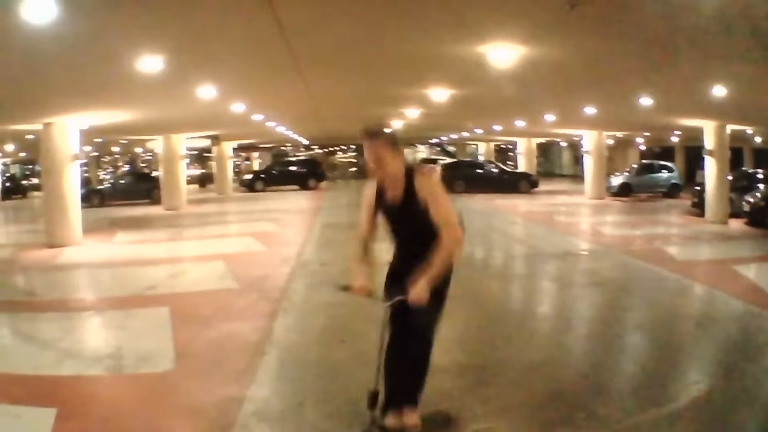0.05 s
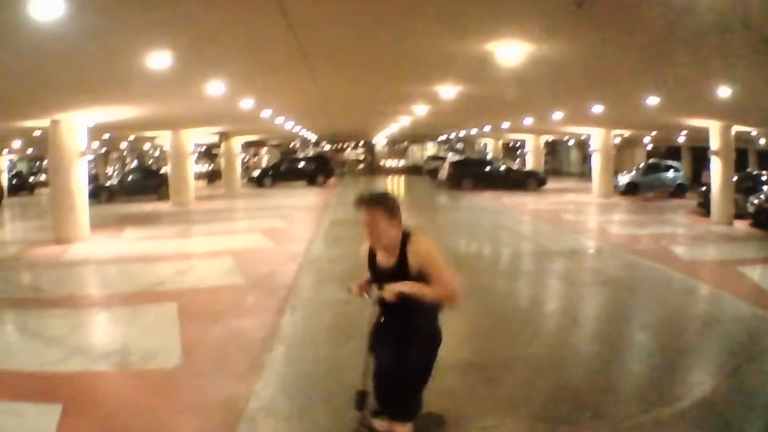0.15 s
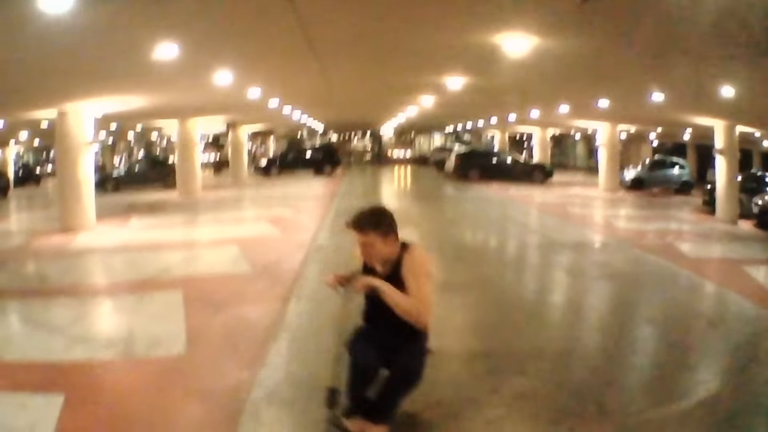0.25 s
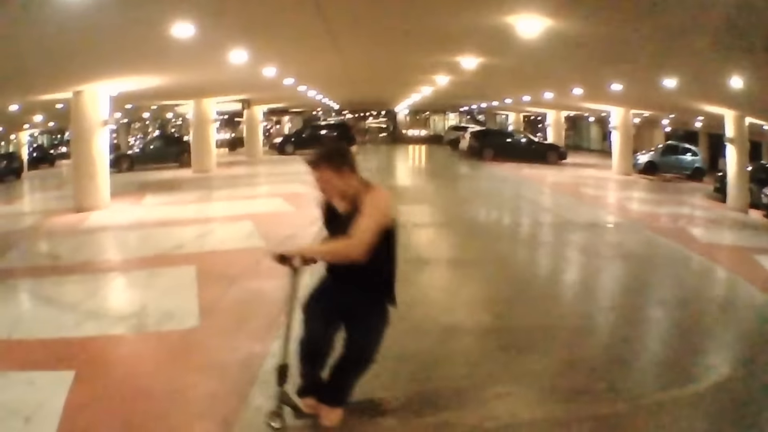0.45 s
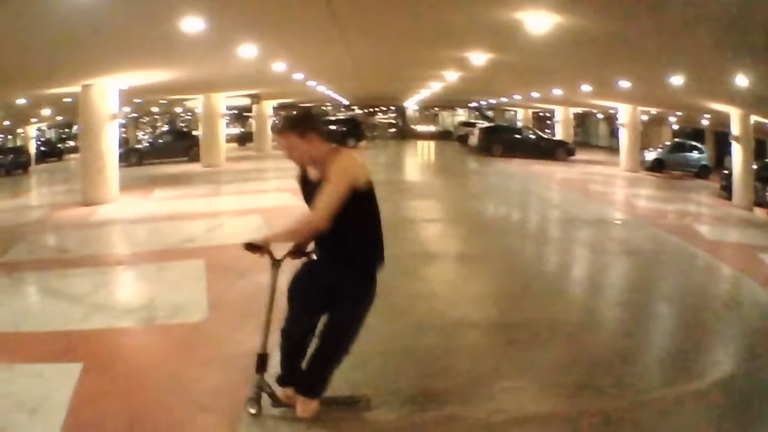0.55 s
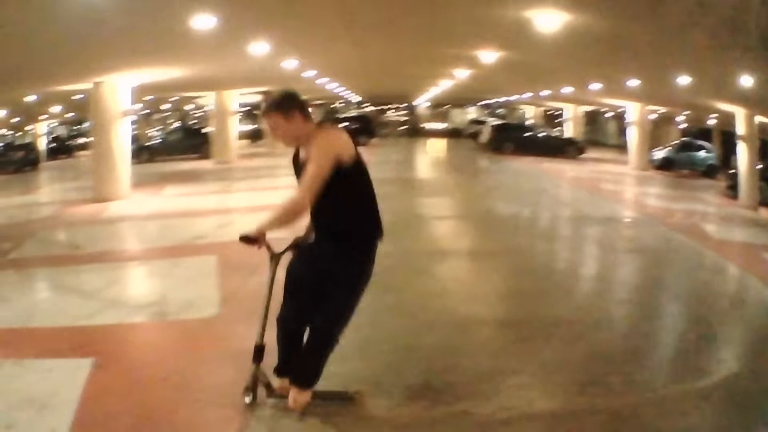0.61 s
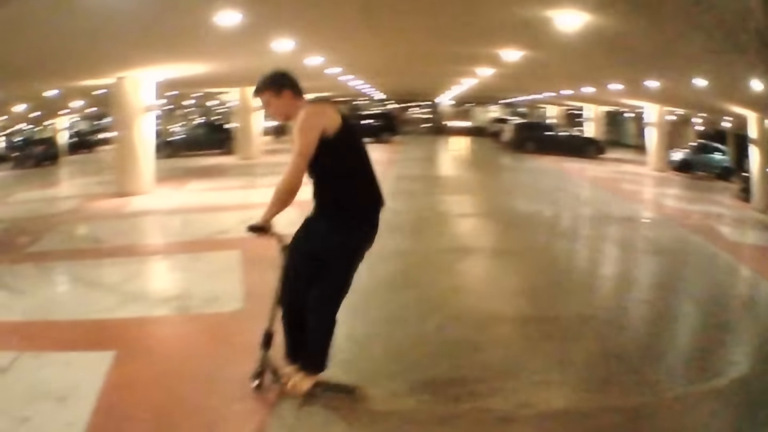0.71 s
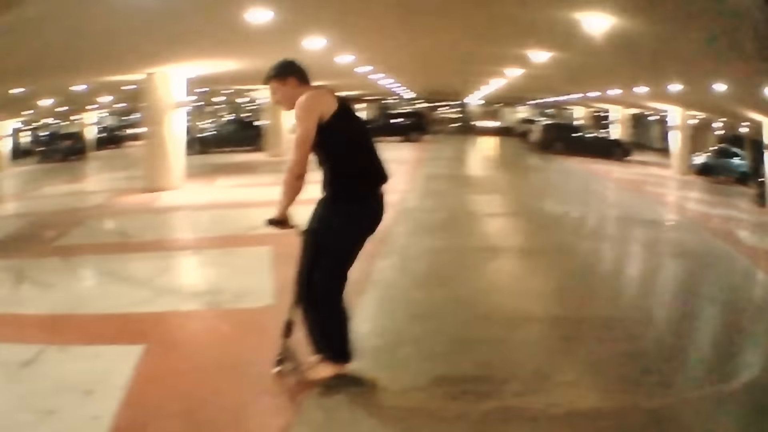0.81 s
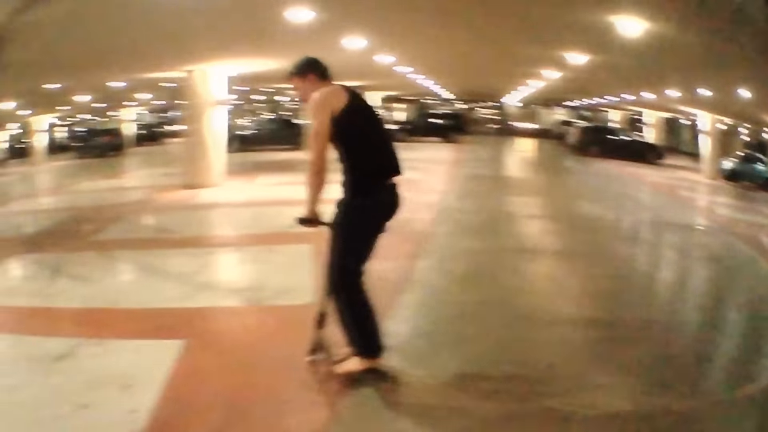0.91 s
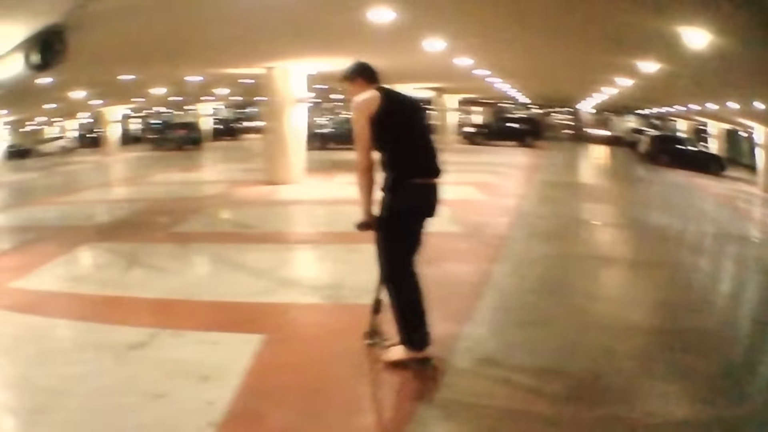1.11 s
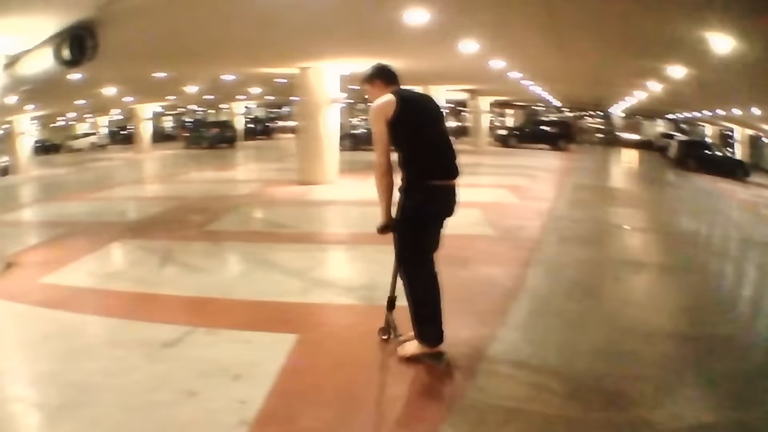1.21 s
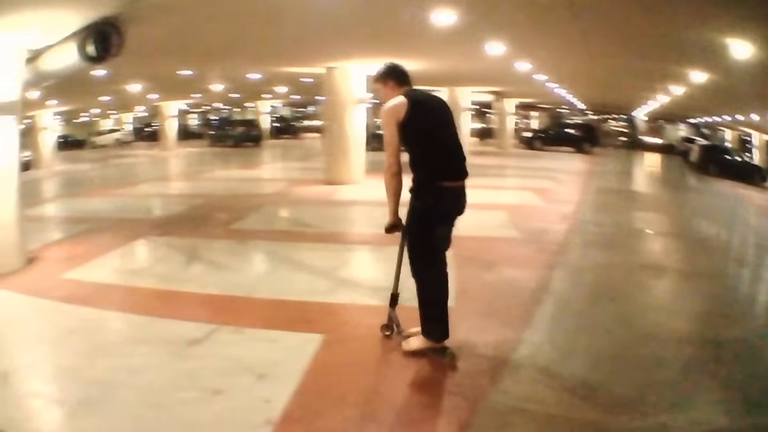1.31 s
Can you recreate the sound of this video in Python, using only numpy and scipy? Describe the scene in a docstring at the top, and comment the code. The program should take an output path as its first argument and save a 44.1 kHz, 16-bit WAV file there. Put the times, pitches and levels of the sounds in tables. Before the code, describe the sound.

A kick scooter slams onto concrete and rolls away in an echoing parking garage.

```python
"""Scooter slam in a parking garage

A kick scooter slams onto concrete with a crack and a ring of its frame, overloading the microphone.
Deck and fork clack as the rider settles, and the large hall rings on. The wheels roll away,
shaken by the grain of the floor, under faint scuffs and over the drone of the ventilation."""
import sys
import numpy as np
from scipy import signal
from scipy.fft import rfft, irfft, next_fast_len
from scipy.io import wavfile
from scipy.ndimage import map_coordinates

SR = 44100
rng = np.random.default_rng(int(sys.argv[2]) if len(sys.argv) > 2 else 0)


def wrap_up_sound(samples):
    """Save the sound to the file named by the first command line argument, as 16-bit audio."""
    columns = np.atleast_2d(samples).T
    # keep every value between -1 and 1, then stretch to whole-number steps
    tamed = np.clip(columns, -1, 1)
    steps = np.round(tamed * 32767).astype(np.int16)
    wavfile.write(sys.argv[1], SR, steps)


N = 59535


def amp(db):
    """Decibels to gain."""
    return 10 ** (np.asarray(db) / 20)


def unit(x):
    """Scale to rms 1."""
    return x / np.sqrt(np.mean(x ** 2) + 1e-20)


def along(points, hz):
    """Read a curve of (Hz, value) points on a log frequency axis."""
    freqs, values = np.transpose(points)
    return np.interp(np.log(hz + 1), np.log(freqs + 1), values)


def filtered(x, response):
    """Shape x with a complex frequency response."""
    size = next_fast_len(len(x) + SR // 5)
    return irfft(rfft(x, size) * response(np.fft.rfftfreq(size, 1 / SR)), size)[:len(x)]


def noise(colour, size=N):
    """Coloured noise of rms 1."""
    return unit(filtered(rng.standard_normal(size), lambda hz: amp(along(colour, hz))))


def wobble(rate):
    """A smooth random curve with rate knots a second."""
    return map_coordinates(rng.standard_normal(N // 20), [np.arange(N) * rate / SR], mode="mirror")


def since(start):
    """Seconds since start, zero before."""
    return np.maximum(np.arange(N) / SR - start, 0)


def passband(x, hz, kind, order=4):
    """A causal low-pass or high-pass."""
    return signal.sosfilt(signal.butter(order, np.clip(hz, 10, SR * .45), kind, fs=SR, output="sos"), x)


def landing(hall_layers=4):
    """The wheels slam down; the hit bounces off the low ceiling and pillars and fills the hall."""
    # Each row: start in seconds, gain in dB, high cut in Hz, low cut in Hz.
    touchdowns = [(0.2084, 4.5, 3320, 2900), (0.2109, -0.5, 12300, 1830), (0.2146, -1, 4490, 60)]
    # Early reflections. Each row: delay in seconds, gain in dB.
    bounces = [(.0065, -22.5), (0.0132, -10.5), (0.0167, -27)]
    dry = sum(contact(*row, ring_scale=0.84) for row in touchdowns)
    early = filtered(dry, lambda hz: sum(amp(db) * np.exp(-2j * np.pi * hz * s) for s, db in bounces))
    # Every layer of the hall gets a fresh crack and a fresh tail.
    hall = sum(garage(contact(*row, ring_scale=0.74)) for row in touchdowns for _ in range(hall_layers))
    return dry + early + hall / np.sqrt(hall_layers)


def contact(start, db, high_cut, low_cut, ring_scale, crack_db=1, crack_t60=0.019, attack_s=0.00014):
    """One knock: a dry crack and the ring of the frame, duller when the contact is soft."""
    # Frame modes. Each row: pitch in Hz, level in dB, T60 in seconds before ring_scale.
    modes = [(458, -18.5, 0.13), (562, -21, 0.067), (782, -12.5, 0.034), (940, -18, 0.093),
             (1322, -12.5, 0.048), (1488.4, -1.5, 0.045), (1873, -13, 0.037), (2398, 1, 0.015),
             (2683, -5, 0.031), (2899, -15, 0.029), (3298, -5.5, 0.027), (3648, -9, .025),
             (4292, -2, 0.027), (4920, -16.5, 0.019), (6280, -10, 0.031)]
    # Each row: frequency in Hz, relative level of the crack in dB.
    crack_colour = [(40, -33.5), (130, -13.5), (450, -9), (900, -4), (1100, -5), (2500, -3), (4500, -3),
                    (5500, -2.5), (7500, -10), (10000, -17), (15000, -30.5)]
    t = np.arange(SR // 6) / SR
    ring = 0
    for k, (hz, level, t60) in enumerate(modes):
        decay = amp(level + rng.standard_normal() - 60 * t / (t60 * ring_scale))
        ring += (-1) ** k * decay * np.sin(2 * np.pi * hz * t)
    crack = amp(crack_db - 60 * t / crack_t60) * noise(crack_colour, size=len(t))
    hit = (ring + crack) * (1 - np.exp(-t / attack_s))
    hit = passband(passband(hit, high_cut, "low"), low_cut, "high")
    return amp(db) * np.pad(hit, (round(start * SR), N))[:N]


def clacks(send_db=-16.5):
    """Deck and fork knock as the rider's weight settles, with less crack under load."""
    # Each row: start in seconds, gain in dB, high cut in Hz, low cut in Hz.
    knocks = [(.2872, -2.5, 1720, 980), (0.2936, -1, 1570, 930), (.303, -10.5, 1440, 600),
              (0.3181, -6, 1390, 727), (0.3273, -7.5, 1410, 800), (0.353, -6, 1500, 600),
              (0.365, -10.5, 4200, 1975), (.3705, -11.5, 5500, 2040), (0.3739, -8, 6000, 2130),
              (0.39, -10.5, 3000, 1490), (0.447, -10.5, 2470, 2000), (0.455, -3, 2170, 1500),
              (0.462, -1.5, 2230, 1600), (0.4684, -6.5, 2050, 1300), (0.4743, -10, 2290, 1410),
              (.481, -10.5, 3020, 1460), (0.536, -4, 1650, 1120), (0.625, -13.5, 1590, 923),
              (.706, -13, 1616, 960), (0.7906, -28, 1590, 910), (0.8174, -9.5, 1600, 1000)]
    dry = sum(contact(*row, ring_scale=0.97, crack_db=-4.5) for row in knocks)
    return dry + amp(send_db) * garage(dry)


def garage(x, gain_db=0.5, build_s=0.027):
    """Long concrete reverb: it builds quickly, and the mids hang on longest."""
    # Each row: frequency in Hz, reverb T60 in seconds.
    decay_times = [(120, 1), (500, 3.5), (1400, 5), (2500, 3.5), (4200, 1.8444), (6400, 1.17),
                   (9000, 0.7853), (14000, 0.47)]
    # Each row: frequency in Hz, gain of the tail in dB.
    colour = [(60, -4.5), (130, 6.5), (400, 7), (600, 3.5), (900, 3.5), (1020, 0), (1150, 8.5), (1480, 0.5),
              (1900, 0.5), (2500, -6.5), (3350, -5), (4280, -7), (4700, 2.5), (5300, -8.5), (6450, 1.5),
              (8000, -6), (10000, -2.5), (14000, -7.5)]
    hz, t, bands = signal.stft(rng.standard_normal(N), SR, nperseg=256)
    decay = amp(-60 * t / along(decay_times, hz)[:, None])
    tail = signal.istft(bands * decay, SR, nperseg=256)[1][:N]
    tail = filtered(tail, lambda f: amp(along(colour, f)))
    tail *= 1 - np.exp(-since(0) / build_s)
    return amp(gain_db) * signal.fftconvolve(x, tail)[:N] / np.sqrt(SR / 10)


def wheels(roughness_db=3.5):
    """The grain of the floor shakes the scooter's resonances through hard wheels as it rolls away."""
    # Each row: time in seconds, level of the roll in dB.
    fader = [(.2, -85), (.23, -24.5), (.4, -29), (0.551, -24), (0.799, -30.5), (1.052, -36.5),
             (1.35, -38.5)]
    # Each row: centre in Hz, width in Hz, gain in dB.
    resonances = [(129.9, 6.9, 6), (195, 24, -6.5), (377, 102.5, -5.5), (572, 210, -11.5),
                  (787, 380, -11.5), (1396, 70, -8.5), (1475, 82, 3), (2470, 250, -15.5), (3250, 120, -9.5)]
    grain = rng.standard_normal(N) * amp(-roughness_db * wobble(rate=70))
    rolling = filtered(grain, lambda f: sum(
        (-1) ** k * amp(db) * 1j * f * width / (centre ** 2 - f ** 2 + 1j * f * width)
        for k, (centre, width, db) in enumerate(resonances)))
    rolling = passband(rolling, hz=3720, kind="low")
    rolling = passband(rolling, hz=79, kind="high", order=3)
    return unit(rolling) * amp(np.interp(since(0), *np.transpose(fader)))


def scuffs():
    """Faint hissy ticks and scuffs around the rider."""
    # Each row: start in seconds, gain in dB, rise in seconds, T60 in seconds, high cut in Hz.
    bursts = [(.13, -44.5, 0.0081, 0.44, 10800), (0.43, -45, 0.0012, 0.02, 15800),
              (.586, -43, 0.0028, .05, 11100), (.866, -47.5, 0.004, 0.061, 8000),
              (.94, -40, 0.0087, .2, 5570)]
    # Each row: frequency in Hz, relative level of the hiss in dB.
    colour = [(800, -28.5), (3000, -2.5), (6500, -0.5), (9000, -7.5), (13000, -15), (16000, -25)]
    mix = np.zeros(N)
    for start, db, rise, t60, high_cut in bursts:
        t = since(start)
        envelope = amp(db - 60 * t / t60) * (1 - np.exp(-t / rise))
        mix += envelope * passband(noise(colour), high_cut, "low", order=3)
    return mix


def takeoff_echo(level_db=-52, t60=1.8):
    """A fading wash of noise: the hall still rings from the take-off."""
    # Each row: frequency in Hz, relative level in dB.
    colour = [(400, -23), (1400, -10), (3300, -11), (4500, -2.5), (6500, -13.5), (8000, -26.5),
              (12000, -49)]
    return amp(level_db - 60 * since(0) / t60) * noise(colour)


def ventilation(level_db=-36):
    """Moving air lays a steady low drone under everything."""
    # Each row: frequency in Hz, relative level in dB.
    colour = [(25, -12.5), (55, -14), (100, -1), (140, 1), (260, -0.5), (360, 2), (430, -5.5), (600, -4.5),
              (750, -12), (2300, -18), (4500, -28.5), (6500, -39), (8000, -50.5), (10000, -56.5),
              (15500, -80.5)]
    return amp(level_db) * noise(colour)


def scene():
    """Scooter and hall over the ventilation, in mono."""
    return (landing() + clacks() + wheels() + scuffs() + ventilation() + takeoff_echo())[None]


def record(dry, top_hz=15900):
    """The slam clips the microphone at full scale; a steep low-pass trims the very top."""
    band_limit = signal.ellip(12, .1, 100, top_hz, fs=SR, output="sos")
    return signal.sosfilt(band_limit, np.clip(dry, -1, 1))


dry = scene()
out = record(dry)
wrap_up_sound(out)
```